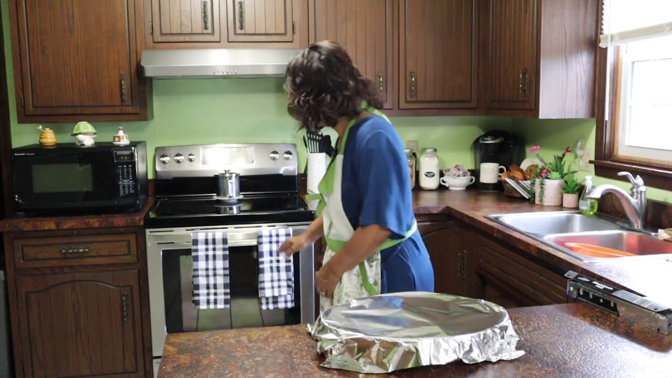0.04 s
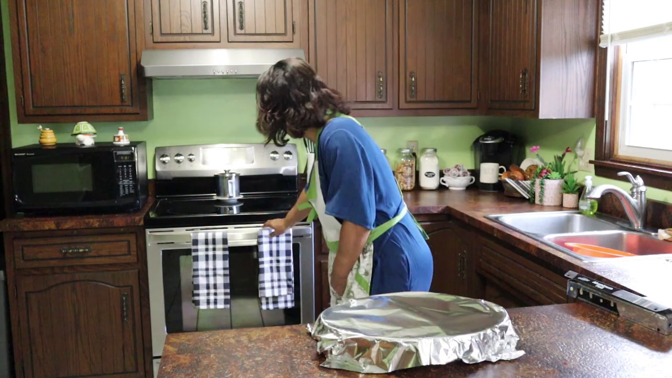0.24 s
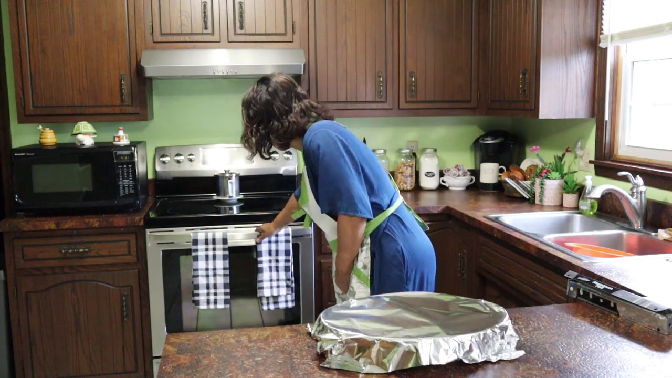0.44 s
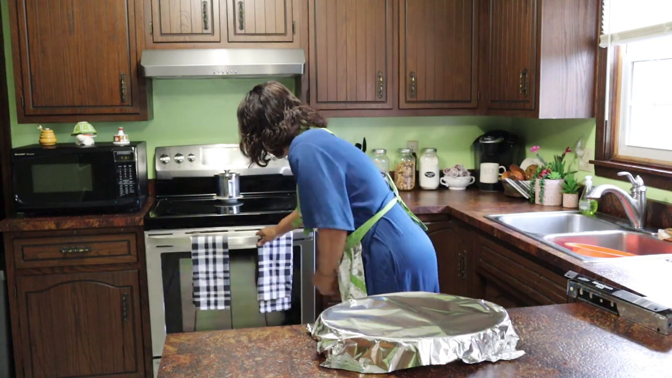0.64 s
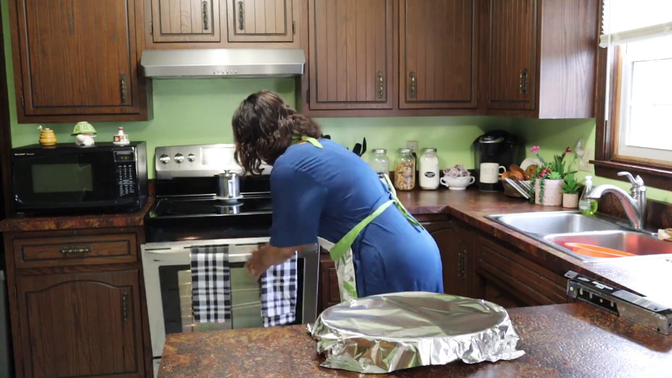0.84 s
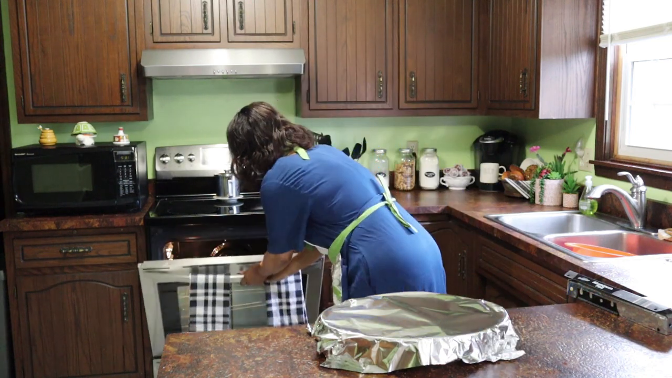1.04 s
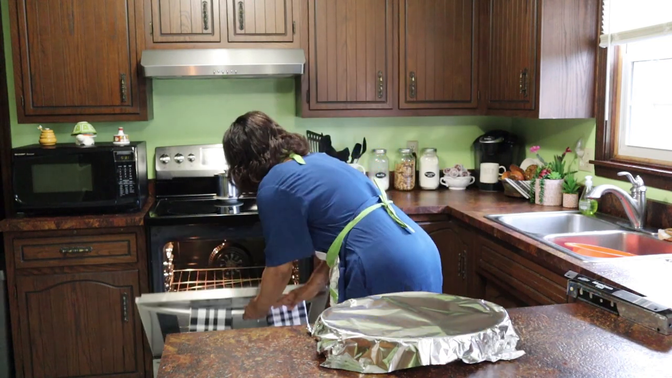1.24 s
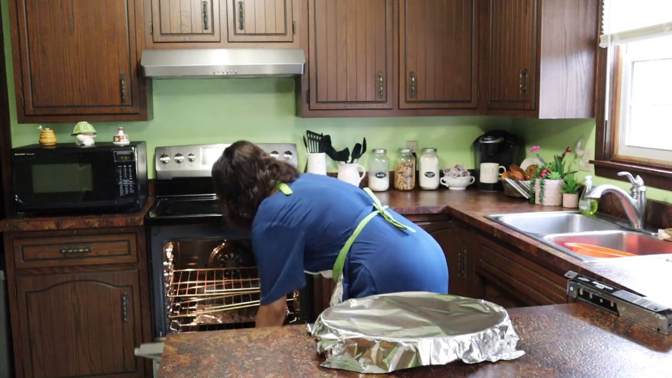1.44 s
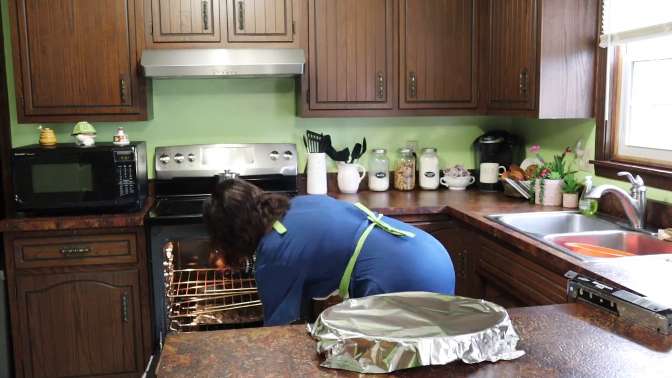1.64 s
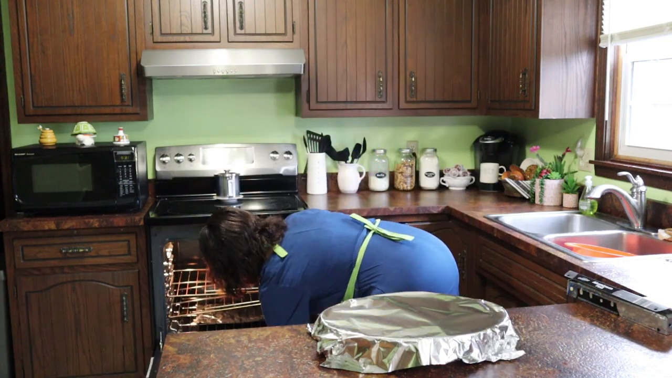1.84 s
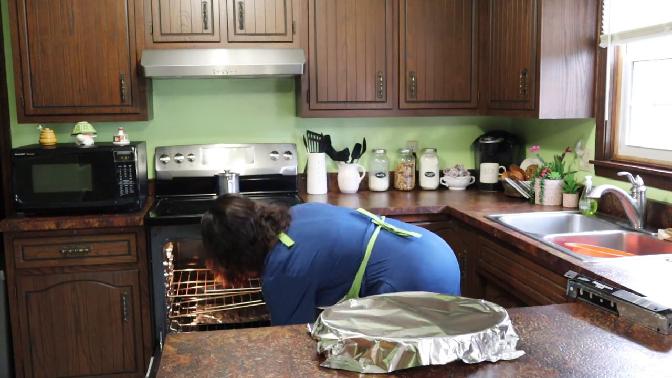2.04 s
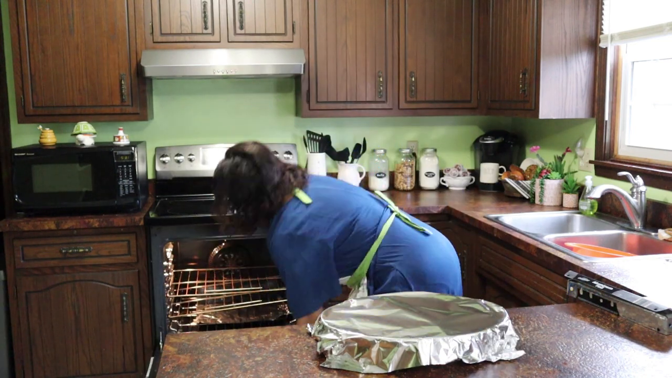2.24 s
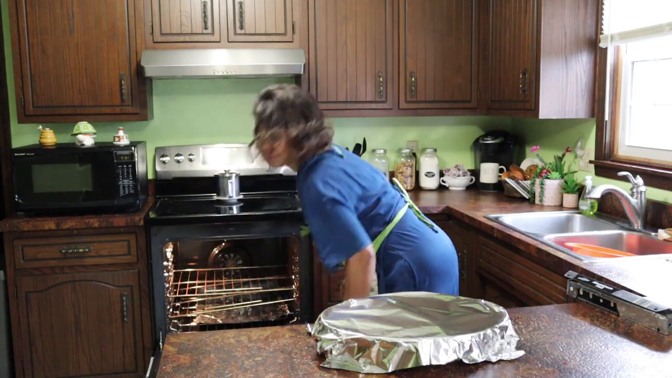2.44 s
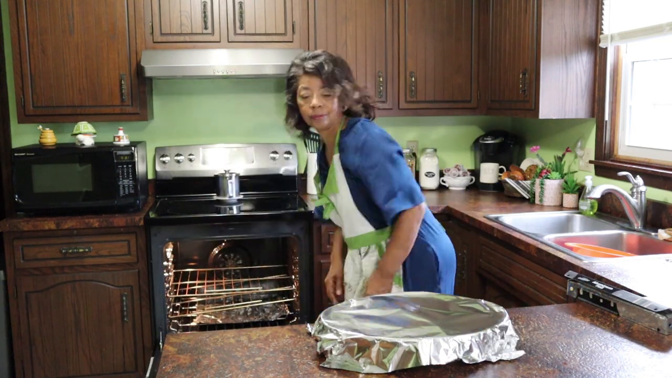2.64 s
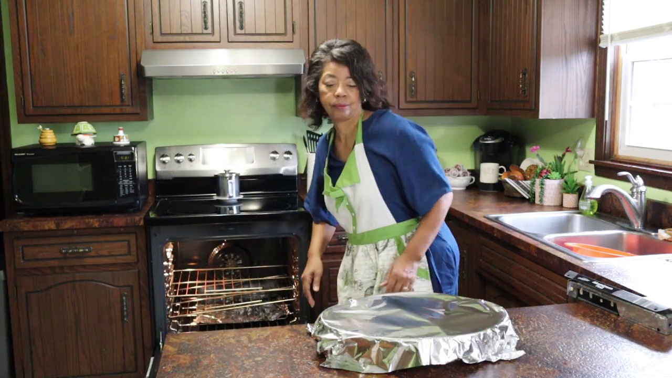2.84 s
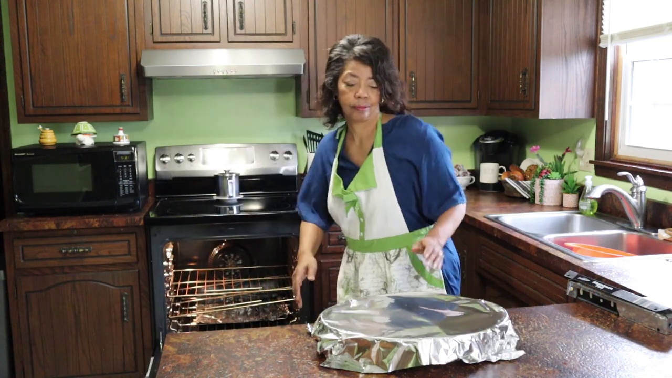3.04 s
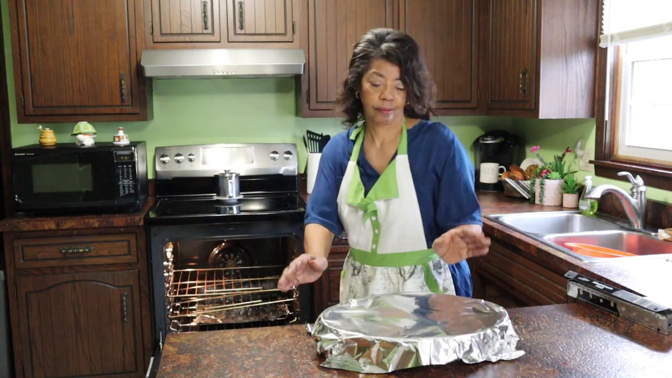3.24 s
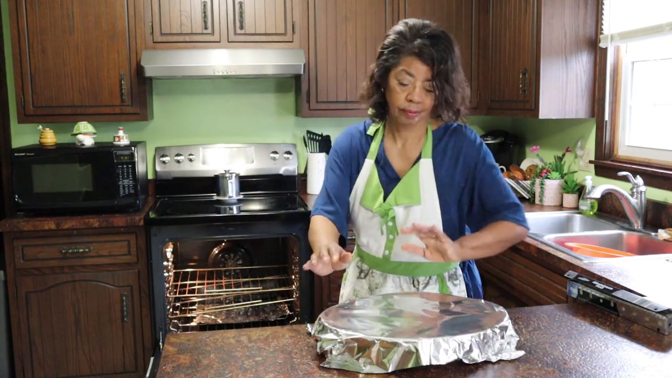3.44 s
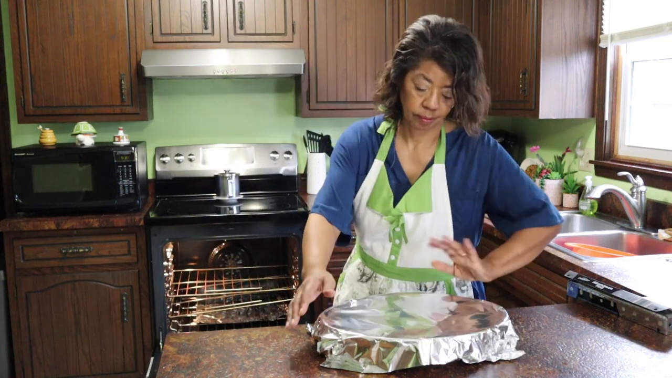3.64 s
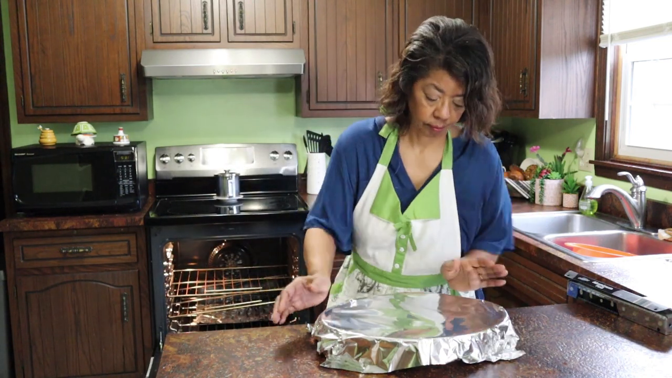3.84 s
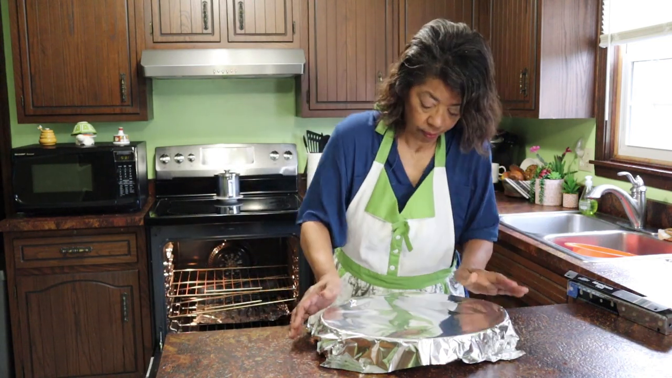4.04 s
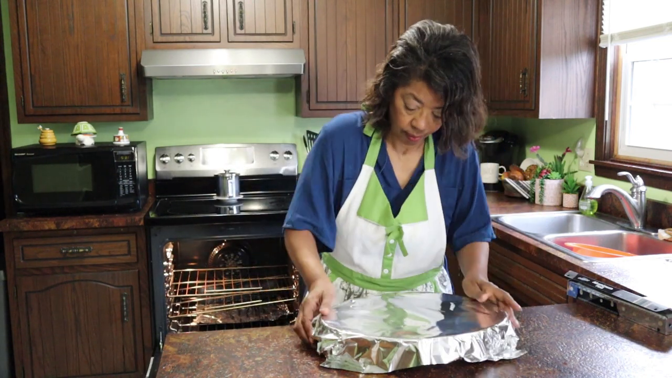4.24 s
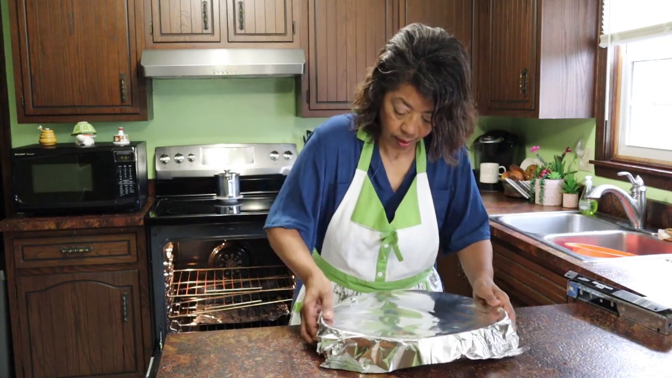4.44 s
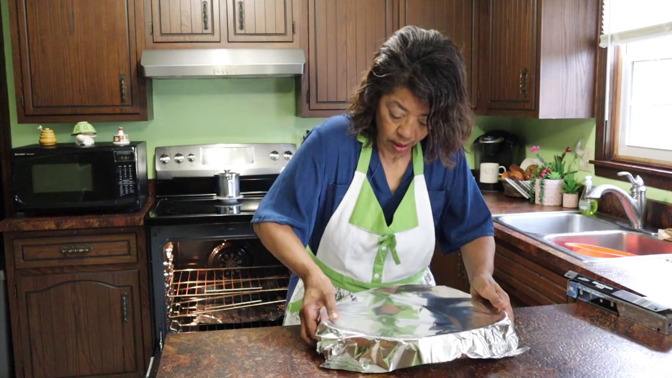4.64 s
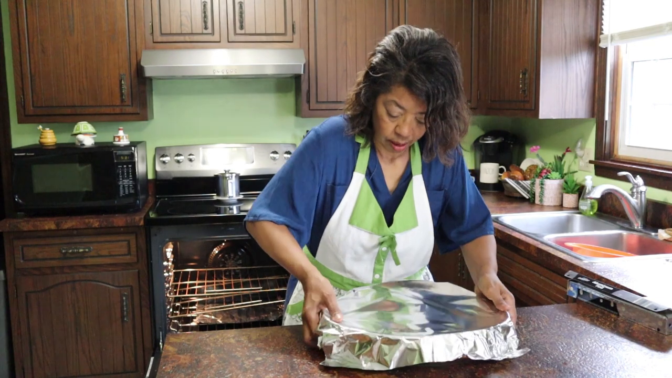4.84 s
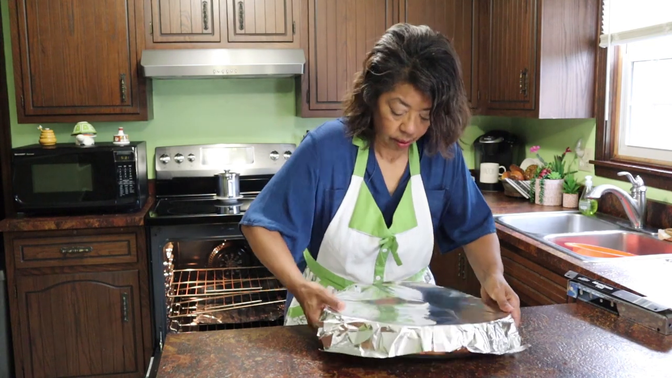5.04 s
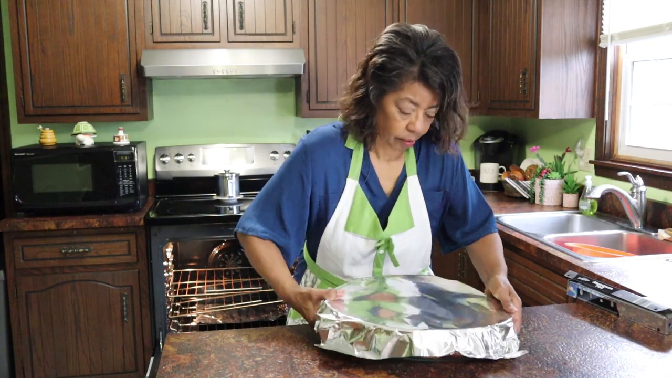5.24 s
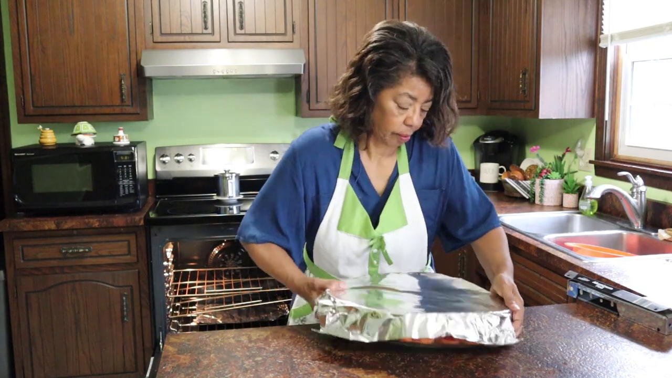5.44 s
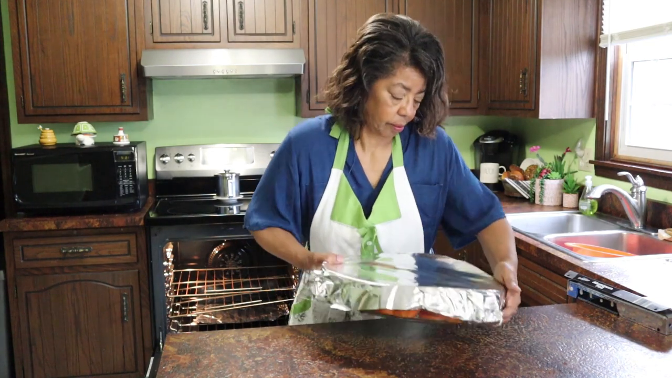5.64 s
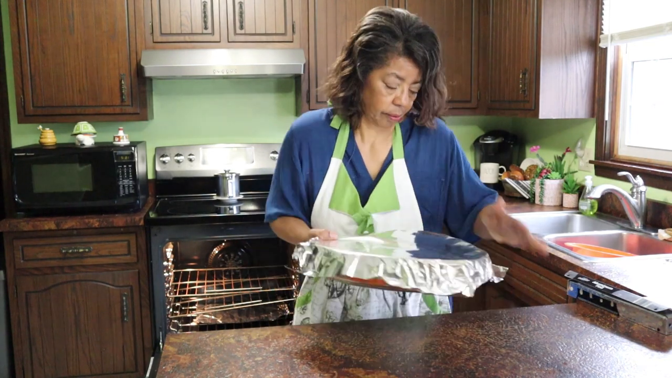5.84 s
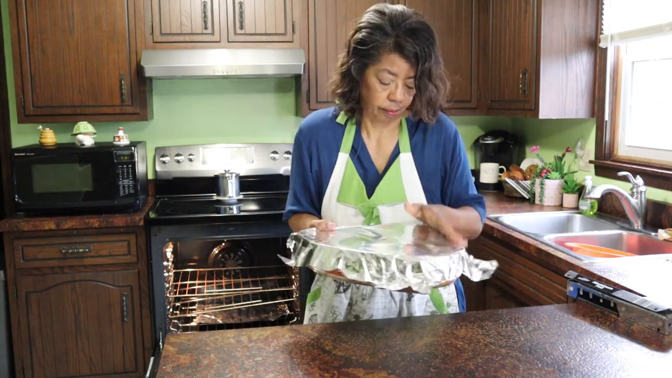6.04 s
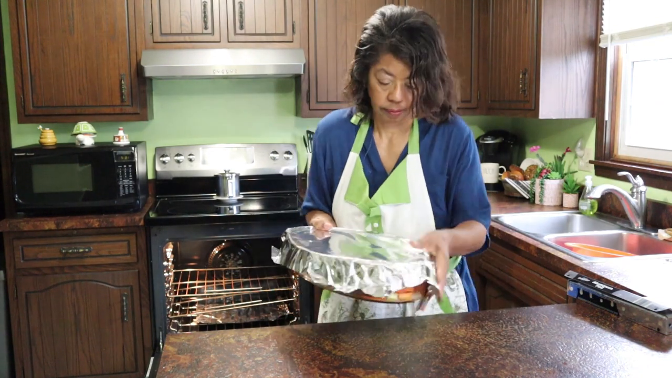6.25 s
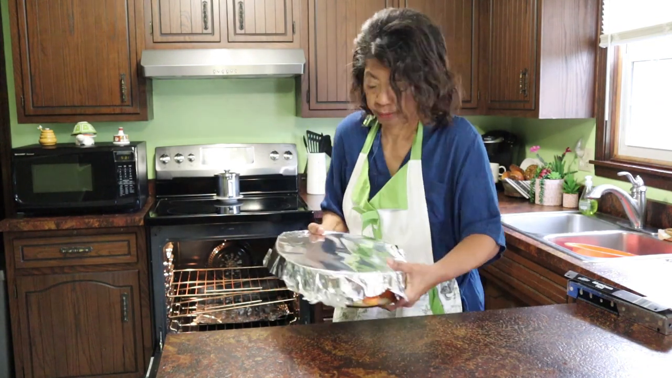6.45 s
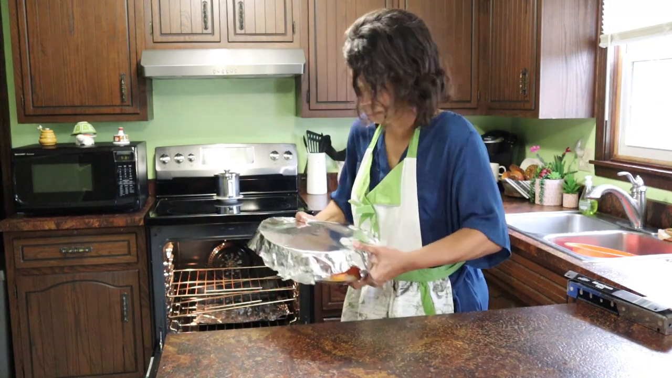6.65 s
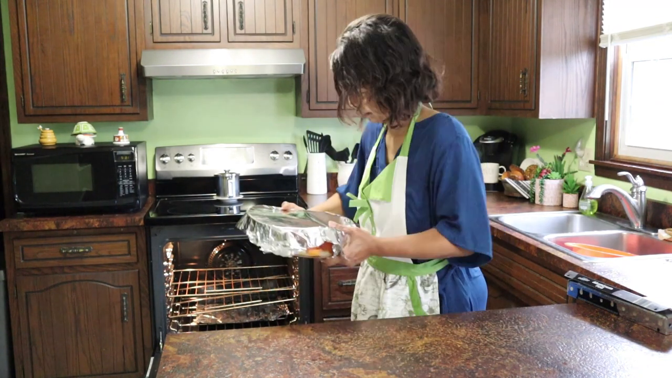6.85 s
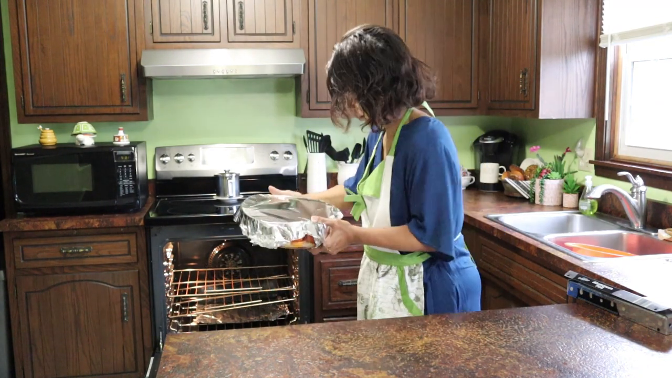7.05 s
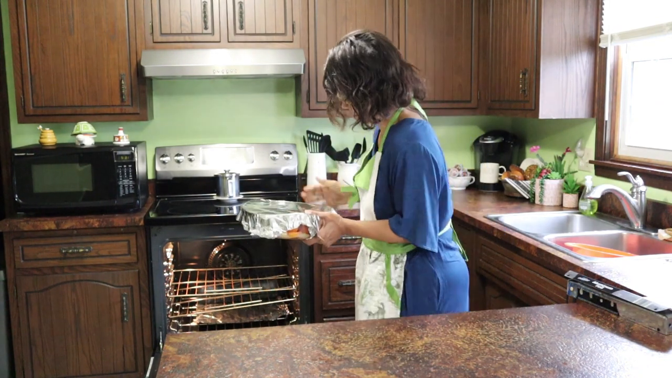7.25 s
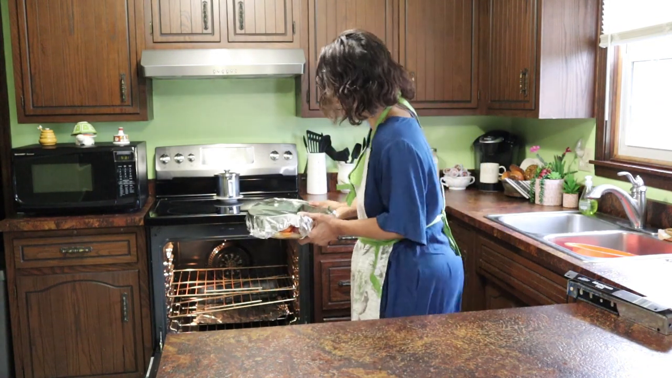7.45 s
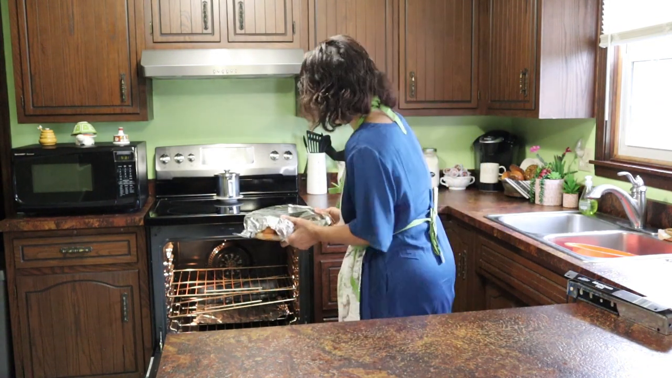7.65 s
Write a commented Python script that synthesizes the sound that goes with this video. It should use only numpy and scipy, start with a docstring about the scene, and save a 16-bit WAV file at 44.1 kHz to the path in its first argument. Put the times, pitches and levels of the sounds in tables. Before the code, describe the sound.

In a quiet home kitchen with a short, bright echo, soft steps lead to an oven door clacking open, its hinges ringing briefly. It swings down with a faint rumble and lands with a metallic thud. Clothing rubs and soles scuff. Close to the stereo microphones, foil starts to crackle, a heavy dish knocks loudly twice, then the foil keeps crinkling in bursts as the dish is lifted and turned away.

```python
"""A kitchen: an oven door is pulled open, its hinges clank, and it drops onto its stops with a thud.
The cook steps to the counter and grips a foil-covered baking dish, which knocks loudly twice as it is lifted.
The foil crackles in her hands: a great many tiny random clicks, denser and larger the harder she grips.
Blows are bursts of clicks, metal and dish ring as dying sines, and clothing and air are filtered noise.
Hard cabinets give a short, bright echo, made of dense random reflections."""
import sys
import numpy as np
from scipy import signal
from scipy.fft import rfft, irfft, next_fast_len
from scipy.io import wavfile

SR = 44100
rng = np.random.default_rng(int(sys.argv[2]) if len(sys.argv) > 2 else 0)


def to_wav(sig):
    """Store sig (one row per channel, or 1-D mono) as 16-bit WAV at the path in sys.argv[1].

    Samples outside -1..1 are clipped; the rate is SR.
    """
    pcm = np.clip(np.atleast_2d(sig), -1, 1) * 32767
    pcm = np.round(pcm).astype(np.int16)
    wavfile.write(sys.argv[1], SR, pcm.T)  # frames by channels


N = 339570  # length in samples
TIME = np.arange(N) / SR  # seconds
FLAT = [(1, 0), (2, 0)]  # an even tone colour: frequency in Hz, level in dB

# All levels in the tables are relative: filters and the room come after them.

# The fingers squeeze the foil as they grip, lift and shift the dish.
# Each row: start in seconds, rise in seconds, hold in seconds, effort in dB.
FOIL_SQUEEZES = [(4.301, 0.021, .005, -26), (4.351, 0.022, 0.0065, -25.5), (4.478, 0.0076, 0.0045, -23.5),
                 (4.516, 0.067, 0.13, -26.5), (4.935, 0.03, 0.055, -21), (5.031, 0.021, 0.14, -27),
                 (5.243, 0.031, 0.011, -23.5), (5.376, 0.015, 0.0073, -24), (5.42, 0.045, 0.021, -21.5),
                 (5.537, 0.032, 0.015, -24), (5.814, 0.067, 0.02, -19.5), (6.156, .02, 0.0024, -30),
                 (6.178, 0.0085, 0.0018, -9), (6.214, 0.053, .19, -23), (6.43, 0.048, 0.0072, -19),
                 (6.531, 0.026, 0.017, -26.5), (6.738, 0.021, 0.016, -24.5), (6.907, 0.016, 0.011, -30.5),
                 (7.159, .02, 0.032, -35.5), (7.426, 0.011, 0.066, -20.5), (7.508, 0.016, .004, -14),
                 (7.595, 0.038, 0.016, -21)]
# The weight of the dish keeps the foil working between squeezes. Each row: time in seconds, effort in dB.
FOIL_STRAIN = [(4.3, -39), (4.92, -39.5), (5.3, -31.5), (5.8, -34.5), (5.97, -42), (6.14, -44.5),
               (6.5, -29), (6.9, -32.5), (7.3, -44), (7.7, -51)]
# Single creases that snap over. Each row: start in seconds, level in dB over 10 ms.
FOIL_SNAPS = [(4.457, -32.5), (4.798, -31), (4.852, -31.5), (4.952, -28), (5.774, -35), (5.835, -24.5),
              (6.604, -34), (6.761, -32), (6.935, -33), (7.007, -30), (7.108, -31.5), (7.185, -30.5),
              (7.333, -31.5)]
# The dish is swung round towards the oven. The two values: start and end in seconds.
DISH_TURN = (6.5, 7.19)
# Tone colour of the foil. Each row: frequency in Hz, level in dB per Hz.
FOIL_COLOUR = [(59, -64), (100, -24), (129, -28.5), (205, -22.5), (270, -16), (429, -13.5), (640, -5.5),
               (742, -6.5), (898, -4), (1370, -6), (3540, -1.5), (8580, -2.5), (11300, -2.5), (13700, -13),
               (15500, -34)]
# Stereo width of the echo from the counter, also used by the dish.
# Each row: frequency in Hz, side level against mid in dB.
COUNTER_WIDTH = [(60, -28), (200, -20), (420, -15.5), (800, -5.5), (1400, -1), (3000, 1), (7000, 0),
                 (13000, 7)]


def foil():
    """Creases buckle all over the sheet: harder crumpling makes them both more frequent and larger."""
    strain = amp(np.interp(TIME, *np.transpose(FOIL_STRAIN), left=-120))
    relax_db_per_s = 304.5  # the crumpling dies away once the fingers stop
    squeeze_power = sum(gesture(*row, relax_db_per_s) ** 2 for row in FOIL_SQUEEZES)
    effort_db = 10 * np.log10(strain ** 2 + squeeze_power)
    creases_per_s = np.clip(4500 * amp(.8 * (effort_db + 22)), 500, 25000)
    creases = crackle(N, creases_per_s, spread_db=3) * amp(effort_db)

    t = np.arange(SR // 100) / SR
    for start, level_db in FOIL_SNAPS:
        snap = unit(rng.standard_normal(len(t)) * np.exp(-t / 0.0029))
        add(creases, start, amp(level_db) * snap)

    # each crease sets its facet fluttering for a moment, in its own way
    flutter = np.exp(-t / 0.00011)
    power = abs(signal.oaconvolve(creases ** 2, flutter / flutter.sum())[:N])
    sheet = np.sqrt(power) * rng.standard_normal(N)

    # as the dish turns, the sound fades over from the counter's echo to the oven's
    turned = np.interp(TIME, DISH_TURN, [0, 1])
    counter = kitchen(COUNTER_WIDTH, direct_db=-4, echo_db=-0.27, lag_count=3, count=5)
    oven = kitchen(COUNTER_WIDTH, direct_db=-5.5, echo_db=0.0, lag_count=-3, count=3)
    at_counter = radiate(sheet * np.sqrt(1 - turned), counter) * amp([[-.55], [.55]])  # a little to the right
    at_oven = radiate(sheet * np.sqrt(turned), oven)
    # the swung sheet shows another face
    at_oven = tint(at_oven, FLAT, [(200, 4), (600, 0), (8000, -1), (12500, 1.0)])

    # harder crumpling sounds brighter, between two limits in dB per octave
    slope_db = np.clip(0.1 * (effort_db + 27.5), -4, 1.1)
    return brighten(tint(at_counter + at_oven, FOIL_COLOUR), slope_db)


# The dish against hands and counter.
# Each row: start in seconds, decay time in seconds, level in dB over 10 ms, bass in dB, body in dB.
DISH_KNOCKS = [(4.269, 0.0051, -32.5, -10, -24), (4.358, 0.0066, -40, -10, 0), (4.819, 0.04, -35.5, 9, 2),
               (5.059, 0.056, -38.5, 11, 2), (5.1647, 0.014, -7.5, 0.5, -4.5),
               (5.27, 0.014, -9.5, -4, -4.5), (6.187, .006, -33.5, -23, -1)]
# Tone colour of the knocks. Each row: frequency in Hz, level in dB per Hz.
KNOCK_COLOUR = [(40, -16), (65, -7.5), (100, -9.5), (170, -6.5), (290, 6.5), (420, -10.5), (520, 1),
                (720, 4), (860, -10.5), (1070, -5), (1250, -14.5), (1500, -14.5), (2200, -20.5),
                (4000, -29), (15000, -55)]
# Ringing of dish and counter top.
# Each row: frequency in Hz, level against the knock in dB, seconds to fall by 60 dB.
DISH_MODES = [(57.5, -23, 0.54), (76.5, -16.5, 0.36), (164.8, -13, 0.35), (186, -14, 0.37),
              (208, -31, 0.28), (229.6, -20.5, 0.64), (263, -14, 0.16), (287.5, -12, 0.21),
              (363, -14.5, 0.34), (483, -8, 0.19), (615, -17.5, 0.54), (686, -14, 0.67), (756, -13, 0.22),
              (756, -7, 0.12), (980, -19, 0.23), (992, -18, 0.33), (1096, -15, 0.23), (1525, -20.5, 0.17)]


def dish():
    """The heavy dish rocks on the counter, close to the microphones: a dull knock and a short ring."""
    spots = kitchen(COUNTER_WIDTH, direct_db=-2.5, echo_db=-1, lag_count=3, count=3)
    rows = [(*row, 0) for row in DISH_KNOCKS]  # treble left as it is
    knocks = clatter(rows, KNOCK_COLOUR, spots, per_s=10000, spread_db=1.5, first_db=-10)
    ringing = strike([(start, db) for start, _, db, *_ in DISH_KNOCKS], DISH_MODES)
    ring_spot = kitchen(COUNTER_WIDTH, direct_db=-3.0, echo_db=-23, lag_count=3, count=1)
    return (knocks + radiate(ringing, ring_spot)) * amp([[-.3], [.3]])  # a little to the right


# Metal meets metal in the hinges and stops.
# Each row: start in seconds, level in dB over 10 ms, treble in dB.
DOOR_CLACKS = [(0.668, -28, 13), (.675, -21, 9), (.823, -20, 8), (.84, -16.5, 2.5), (.96, -27, 13),
               (.978, -26, -10), (1.949, -30, 5), (1.957, -15.5, 2.5)]
# The hollow door panel is jolted. Each row: start in seconds, level in dB over 10 ms, bass in dB.
DOOR_THUDS = [(.611, -39.5, -1), (0.647, -36.5, 2), (.885, -32, 17), (.912, -42, 1), (1.02, -41, 0),
              (1.918, -39.5, 21), (1.95, -37, 20.5), (1.974, -29, 7)]
# Tone colour of clacks and thuds. Each row: frequency in Hz, level in dB per Hz.
DOOR_COLOUR = [(40, -5), (78, 6.5), (170, -6.5), (400, 3.5), (750, 0), (1550, -0.5), (2800, -1.5),
               (4500, -9.5), (7500, -23.5), (12800, -36), (15000, -55)]
# Dry hinge metal rasps as the door breaks free and as it lands.
# Each row: start in seconds, decay time in seconds, level in dB over 10 ms.
HINGE_RASPS = [(0.667, 0.028, -31.5), (1.964, .012, -36)]
# Tone colour of the rasps. Each row: frequency in Hz, level in dB per Hz.
RASP_COLOUR = [(3000, -33), (9000, -12), (13000, 8), (14000, -12), (15500, -32)]
# Clanks that ring the hinge springs. Each row: start in seconds, level in dB.
HINGE_CLANKS = [(0.674, -29.5), (0.961, -36)]
# Tones of hinge and door panel. Each row: frequency in Hz, level in dB, seconds to fall by 60 dB.
HINGE_MODES = [(327, -14, 0.91), (444, -7, 0.2), (538, -9.5, .3), (942, 3.5, 0.3), (1160, 0.5, 0.2),
               (1640, 1, 0.16), (1850, -6, 0.22), (2672, -6, .25), (2746, 1, 0.18), (2950, -2, 0.13),
               (3095, -4, 0.26), (5100, -15, .3), (6202, -5, 0.18)]
# The door shudders as it tips, swings down and settles.
# Each row: start in seconds, rise in seconds, hold in seconds, level in dB.
DOOR_SHUDDERS = [(.9, 0.2, 0.25, -53), (1.428, .09, 0.11, -44), (1.9, .1, 0.18, -55)]
# Stereo width of the echo from the oven corner, also used by the cook.
# Each row: frequency in Hz, side level against mid in dB.
OVEN_WIDTH = [(60, -44), (200, -20), (600, -9.5), (1400, -1), (3000, 3), (7000, 5), (13000, 10)]


def oven_door():
    """Hinges clatter and ring; the hollow panel thuds, and rumbles on the way down."""
    spots = kitchen(OVEN_WIDTH, direct_db=-10.0, echo_db=-2.5, lag_count=-4)

    fade_db_per_s = 100
    shudder = rng.standard_normal(N) * sum(gesture(*row, fade_db_per_s) for row in DOOR_SHUDDERS)
    rumble_colour = [(20, -15), (38, -2), (75, -0.5), (120, -14.0), (200, -13.5), (500, -29), (2000, -90)]
    rumble = tint(radiate(shudder, spots[:2]), rumble_colour)

    # both kinds of blow become: start, decay time, level, bass, body, treble
    clacks = [(start, 0.016, db, -7.5, -8, treble_db) for start, db, treble_db in DOOR_CLACKS]
    thuds = [(start, 0.026, db, bass_db, 11, -3) for start, db, bass_db in DOOR_THUDS]
    blows = clatter(clacks + thuds, DOOR_COLOUR, spots, per_s=5000, spread_db=2.5, first_db=-13.0)

    rasp_rows = [(*row, 0, 0, 0) for row in HINGE_RASPS]  # no extra bass, body or treble
    rasp = clatter(rasp_rows, RASP_COLOUR, spots, per_s=10000, spread_db=11, first_db=-25)
    clanks = radiate(strike(HINGE_CLANKS, HINGE_MODES), spots[:1])
    return blows + rasp + rumble + clanks


# Soft footfalls. Each row: start in seconds, level in dB over 10 ms.
FOOTFALLS = [(.12, -43.5), (.51, -47.5), (2.28, -45.5), (2.43, -43.5), (2.61, -48), (2.746, -44.5),
             (3.052, -53.5), (3.311, -45), (4.036, -49.5), (7.289, -43.5)]
# Scuffs of soles and brushes of the hand.
# Each row: start in seconds, decay time in seconds, level in dB over 10 ms, treble in dB.
SCUFFS = [(0.169, .025, -35, -12), (0.193, 0.051, -32.5, -2), (0.469, 0.067, -43.5, 9),
          (0.526, 0.018, -39.5, 4), (2.23, 0.027, -40, 8), (2.397, 0.055, -32.5, 2.5),
          (2.546, 0.041, -41.5, 11.5), (2.67, 0.047, -40, 4), (3.336, 0.02, -35, 1.5),
          (3.536, 0.02, -39, 1)]
# Tone colour of steps and scuffs. Each row: frequency in Hz, level in dB per Hz.
STEP_COLOUR = [(40, -1), (140, -9), (300, 0), (540, -4), (800, 3.5), (1050, -0.5), (1500, -5.5), (2100, -3),
               (4500, -11), (7500, -21), (12300, -22.5), (15000, -43)]
# Clothing and towels slide with each movement.
# Each row: start in seconds, rise in seconds, hold in seconds, level in dB, brightness in dB per octave.
CLOTH_RUBS = [(0, 0.018, 1.55, -55, 2), (1.15, 0.17, 0.93, -49, 0.2), (1.239, .035, .01, -50, 11),
              (1.567, 0.095, .03, -43.5, 1), (2.5, 0.17, .02, -52, 3), (3.194, 0.21, .03, -50.5, 2.5),
              (3.82, 0.1, .03, -59, 2)]
# Tone colour of cloth. Each row: frequency in Hz, level in dB per Hz.
CLOTH_COLOUR = [(88, -27), (150, -6.5), (371, -7.5), (450, -3.5), (1070, -10.5), (1570, -10.5),
                (4050, -20.5), (11700, -30), (15000, -40)]


def cook():
    """Soft steps, scuffs and the rub of clothing; the stronger a rub, the more its brightness counts."""
    spots = kitchen(OVEN_WIDTH, direct_db=-7.5, echo_db=-1.5, lag_count=-4, count=3)

    fade_db_per_s = 89
    power = np.array([gesture(*row[:4], fade_db_per_s) ** 2 for row in CLOTH_RUBS]) + 1e-14
    slope_db = np.array([row[4] for row in CLOTH_RUBS]) @ power / power.sum(0)
    fibres = crackle(N, 6000, 5.9) * np.sqrt(power.sum(0))
    cloth = brighten(tint(radiate(fibres, spots), CLOTH_COLOUR), slope_db)

    # both become: start, decay time, level, bass, body, treble
    steps = [(start, 0.014, db, 1.5, 8.5, 3.5) for start, db in FOOTFALLS]
    scuffs = [(start, decay_s, db, -5, -3.5, treble_db) for start, decay_s, db, treble_db in SCUFFS]
    return cloth + clatter(steps + scuffs, STEP_COLOUR, spots, per_s=3500, spread_db=3.5, first_db=-26)


# Tone colour of the quiet house. Each row: frequency in Hz, level in dB per Hz.
HOUSE_COLOUR = [(12, -33), (20, -11), (95, -6), (166, -10), (238, -7.5), (382, -8.5), (491, -6.5),
                (534, -9), (1450, -12.5), (1720, -13), (3960, -19.5), (14300, -37.5), (15500, -62)]
# Its stereo width. Each row: frequency in Hz, side level against mid in dB.
HOUSE_WIDTH = [(60, -18.5), (180, -1), (550, 4.5), (1650, 6), (4970, 5.5), (15000, 5.5)]


def ambience():
    """The steady low murmur and hiss of the house, made of filtered noise."""
    noise = rng.standard_normal((2, N + SR))
    air = tint(noise, HOUSE_COLOUR, [(8000, 1.0), (12500, 4.0), (15000, -7)])[:, SR:]  # skip the filter's start
    return amp(-50.5) * pair(air, HOUSE_WIDTH)


def clatter(rows, colour, spots, per_s, spread_db, first_db):
    """Each blow is one first contact and a dying cluster; bass, body and treble are set against 1-2.8 kHz."""
    out = np.zeros((2, N))
    t = np.arange(SR // 2) / SR
    for start, decay_s, db, bass_db, body_db, treble_db in rows:
        burst = crackle(len(t), per_s, spread_db) * np.exp(-t / max(decay_s, .002))
        burst[0] = amp(first_db) * np.linalg.norm(burst)
        # the whole energy of the burst counts as if spread over 10 ms
        burst *= amp(db) * np.sqrt(SR / 100) / np.linalg.norm(burst)
        shade = [(120, bass_db), (260, body_db), (600, body_db), (1000, 0), (2800, 0), (5500, treble_db)]
        add(out, start, tint(radiate(burst, spots), colour, shade))
    return out


def strike(rows, modes):
    """Every blow rings the same modes."""
    out, tone = np.zeros(N), ring(modes)
    for start, db in rows:
        add(out, start, amp(db) * tone)
    return out


def ring(modes):
    """Dying sines, each starting softly at its own random phase."""
    t = np.arange(SR) / SR
    hz, db, t60 = np.transpose(modes)[:, :, None]
    phase = 2 * np.pi * rng.random(hz.shape)
    sines = amp(db - 60 * t / t60) * np.sin(2 * np.pi * hz * t + phase)
    return sines.sum(0) * (1 - np.exp(-t / 0.0021))


def crackle(count, per_s, spread_db):
    """Tiny contacts at random moments, of random sign and size; mean power about one."""
    chance, size, sign = rng.random((3, count))
    height = unit(amp(spread_db * np.minimum(-np.log(1 - size), 3)))
    share = np.clip(per_s / SR, 1e-4, 1)  # chance of a contact at each sample
    return (chance < share) * np.sign(sign - .5) * height / np.sqrt(share)


def gesture(start, rise, hold, db, fade_db_per_s):
    """Gain of one movement: it builds up, holds and dies away."""
    t = TIME - start
    build_up = np.clip(t / max(rise, .001), 0, 1)
    return build_up * amp(db - fade_db_per_s * np.maximum(t - rise - hold, 0))


# How long the echo lasts. Each row: frequency in Hz, seconds to fall by 60 dB.
ECHO_T60 = [(80, 0.54), (400, 0.33), (1500, 0.42), (4000, 0.33), (8000, 0.28), (14000, 0.3)]


def kitchen(width, direct_db, echo_db, lag_count, count=5):
    """Room responses from nearby spots: direct sound (left later by lag_count samples), dense reflections."""
    t, spots = np.arange(SR // 2) / SR, []
    for _ in range(count):
        taps = np.array([crackle(len(t), 9000, 1.87) for _ in range(2)])
        # each frequency dies away at its own speed
        hz, at, z = signal.stft(taps, SR, nperseg=256)
        decay = amp(-60 * at / read(ECHO_T60, hz)[:, None])
        tail = signal.istft(z * decay, SR, nperseg=256)[1][:, :len(t)]
        tail = pair(tail * np.clip((t - .001) / 0.001, 0, 1), width)  # reflections set in after 1 ms
        tail *= amp(echo_db) / np.sqrt((tail ** 2).sum() / 2)
        tail[0, max(lag_count, 0)] += amp(direct_db)
        tail[1, max(-lag_count, 0)] += amp(direct_db)
        spots.append(tail)
    return spots


def radiate(x, spots):
    """Each contact sounds from one of the spots, with that spot's own echo."""
    out = np.zeros((2, len(x)))
    spot = rng.integers(0, len(spots), len(x))
    # leave out the near-silence before and after the sound
    first, last = np.flatnonzero(abs(x) >= abs(x).max() / 1000)[[0, -1]]
    for k, room in enumerate(spots):
        from_spot = (x * (spot == k))[None, first:last + 1]
        add(out, first / SR, signal.fftconvolve(from_spot, room, axes=1))
    return out


def pair(x, width):
    """Two unrelated signals become a diffuse field of the given width at two close microphones."""
    hz, side_db = np.transpose(width)
    total_db = 10 * np.log10(1 + amp(side_db) ** 2)
    mid = tint(x[0], FLAT, np.column_stack([hz, -total_db]))[0]
    side = tint(x[1], FLAT, np.column_stack([hz, side_db - total_db]))[0]
    return np.array([mid + side, mid - side])


def tint(x, colour, shade=FLAT, size=4096):
    """Causal (minimum-phase) filter: a colour of unit power, times an extra shading in dB."""
    hz = abs(np.fft.fftfreq(size, 1 / SR))
    gain = unit(amp(read(colour, hz))) * amp(read(shade, hz))
    log_gain = np.log(np.maximum(gain, 1e-5))
    taps = np.fft.ifft(np.exp(np.conj(signal.hilbert(log_gain)))).real
    return signal.oaconvolve(np.atleast_2d(x), taps[None, :size // 2], axes=1)[:, :x.shape[-1]]


def brighten(x, slope_db):
    """Tilts a sound about 3 kHz by a moving slope in dB per octave, using three overlapping bands."""
    size = next_fast_len(N, True)
    octave = np.log2((np.fft.rfftfreq(size, 1 / SR) + 1) / 3000)
    spectrum = rfft(x, size)
    centres = np.array([-2, 0, 2])  # octaves from 3 kHz
    out = 0
    for centre in centres:
        share = np.interp(octave, centres, centres == centre)
        out = out + irfft(spectrum * share, size)[:, :N] * amp(slope_db * centre)
    return out


def amp(db):
    """Decibels to gain."""
    return 10 ** (np.asarray(db) / 20)


def unit(x):
    """Scales to an rms of one."""
    return x / np.sqrt(np.mean(x ** 2) + 1e-20)


def read(points, hz):
    """Reads a table on a log-frequency axis."""
    f, value = np.transpose(points)
    return np.interp(np.log(hz + 1), np.log(f + 1), value)


def add(mix, start, sound):
    """Mixes a sound in at a start time in seconds."""
    part = mix[..., round(start * SR):][..., :sound.shape[-1]]
    part += sound[..., :part.shape[-1]]


def scene():
    """All sources at the two microphones."""
    return oven_door() + cook() + dish() + foil() + ambience()


def record(dry):
    """The recorder rounds off the very highest peaks, then limits the band to 15.6 kHz."""
    rounded = dry / (1 + (dry / .8) ** 6) ** (1 / 6)
    lowpass = signal.firwin(511, 15600, window=("kaiser", 9), fs=SR)
    return signal.oaconvolve(rounded, lowpass[None], "same")


dry = scene()
out = record(dry)
to_wav(out)
```